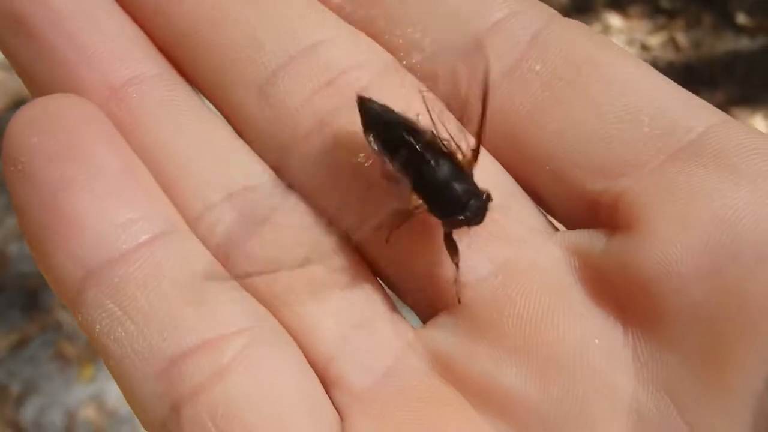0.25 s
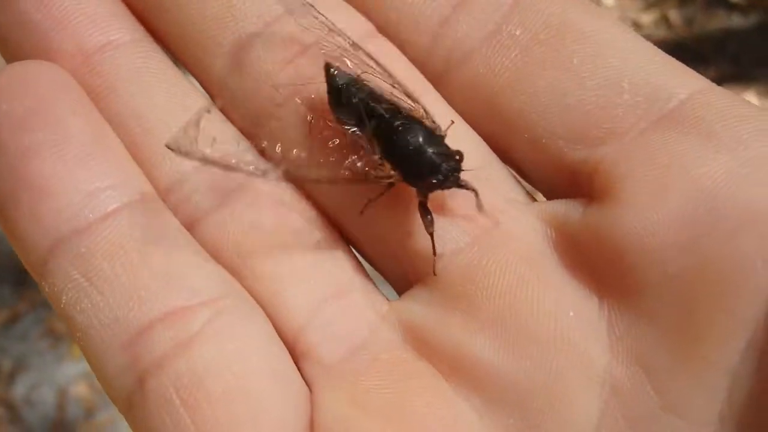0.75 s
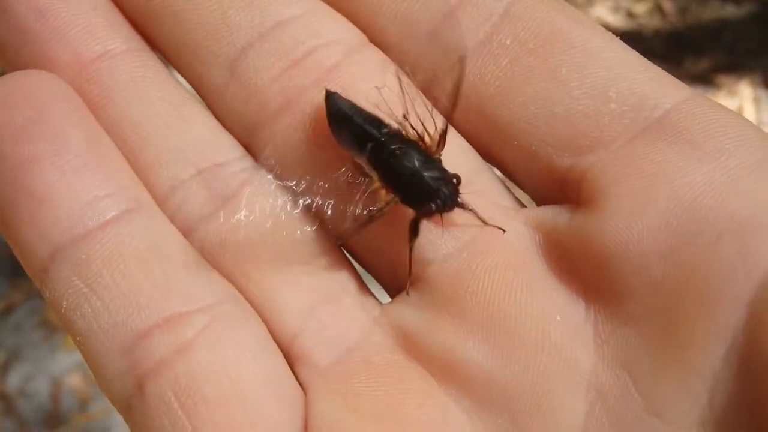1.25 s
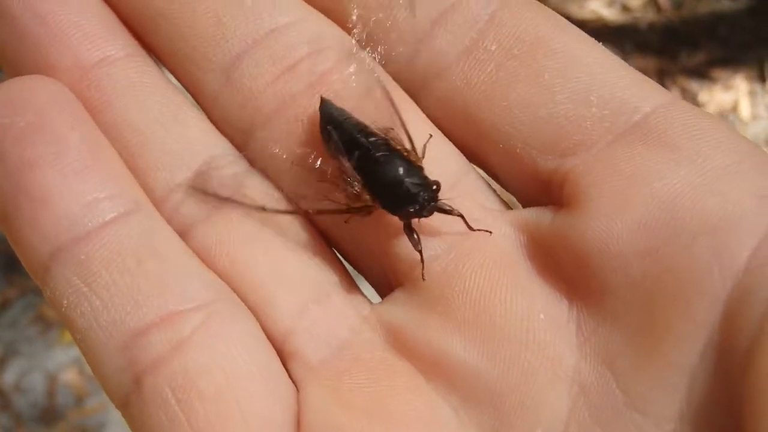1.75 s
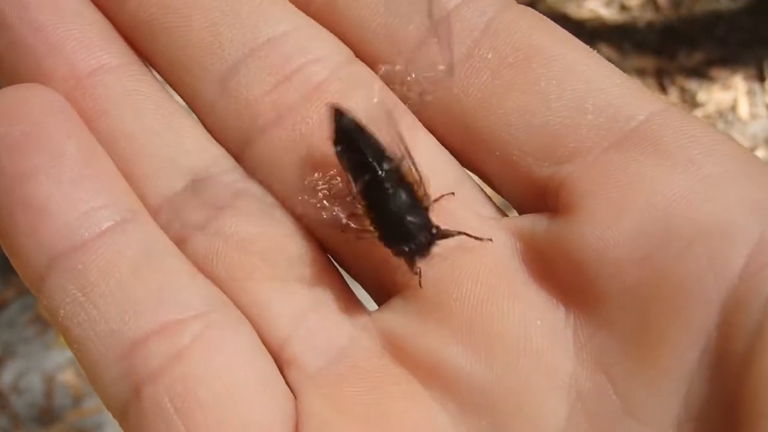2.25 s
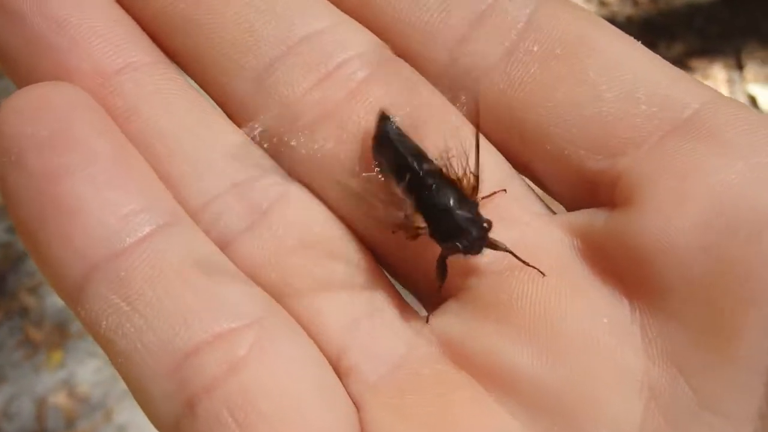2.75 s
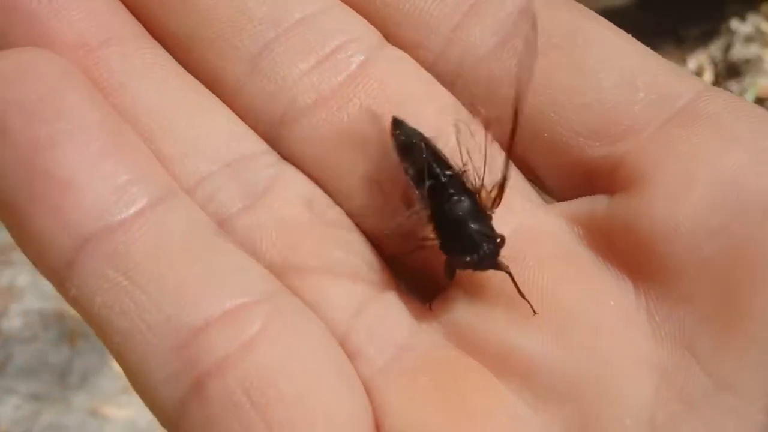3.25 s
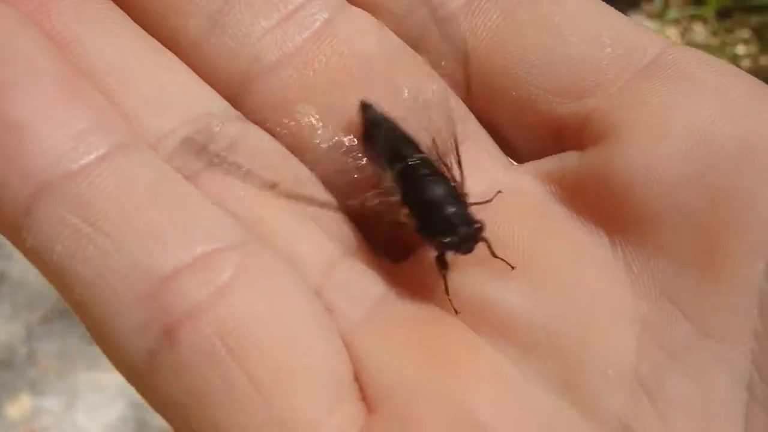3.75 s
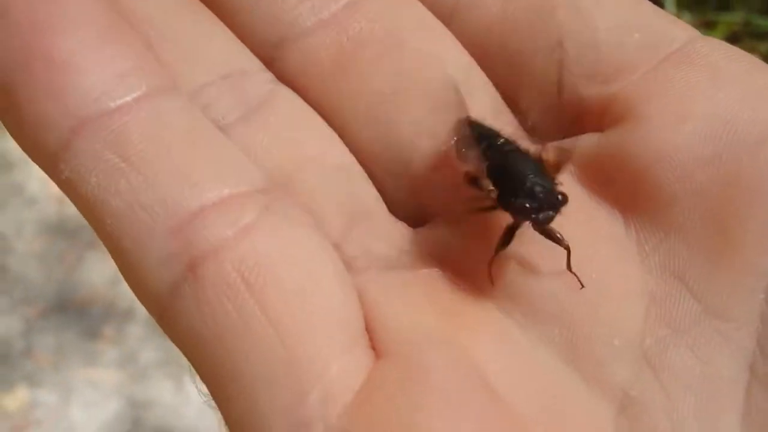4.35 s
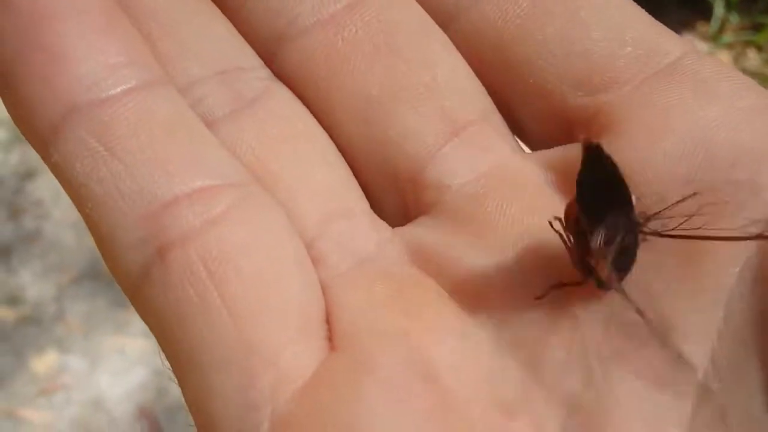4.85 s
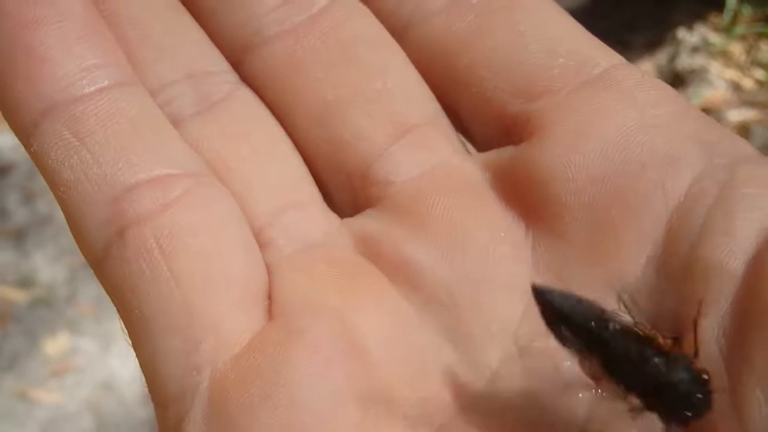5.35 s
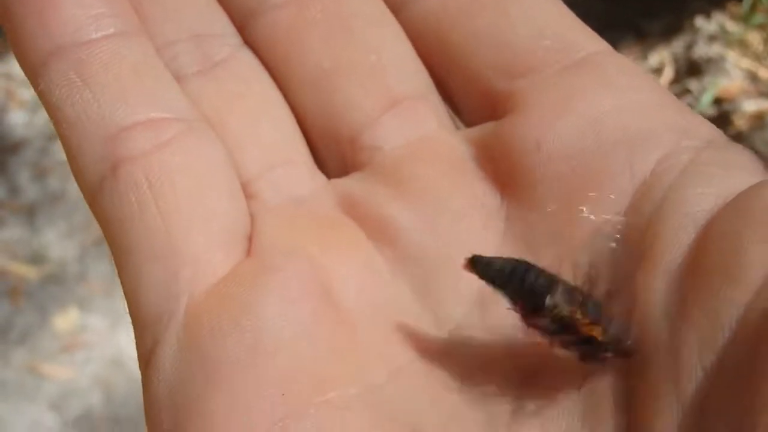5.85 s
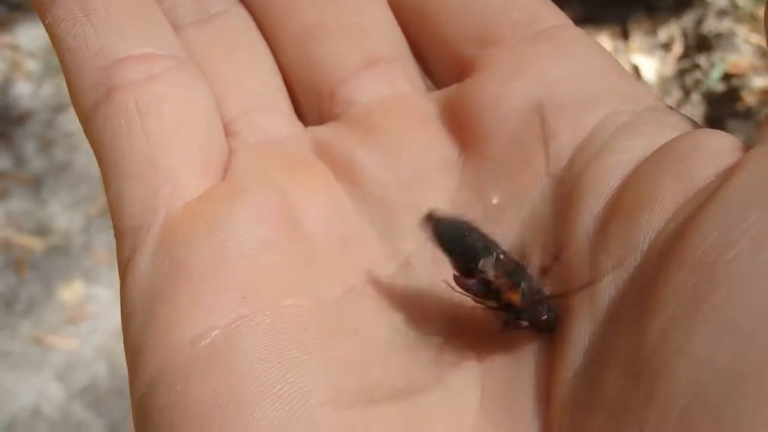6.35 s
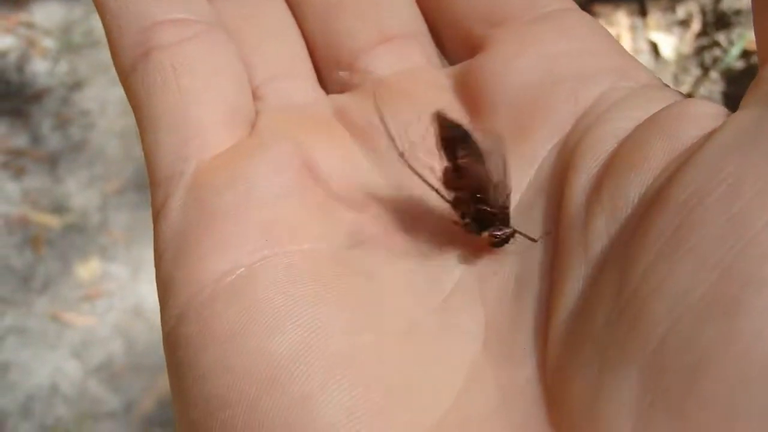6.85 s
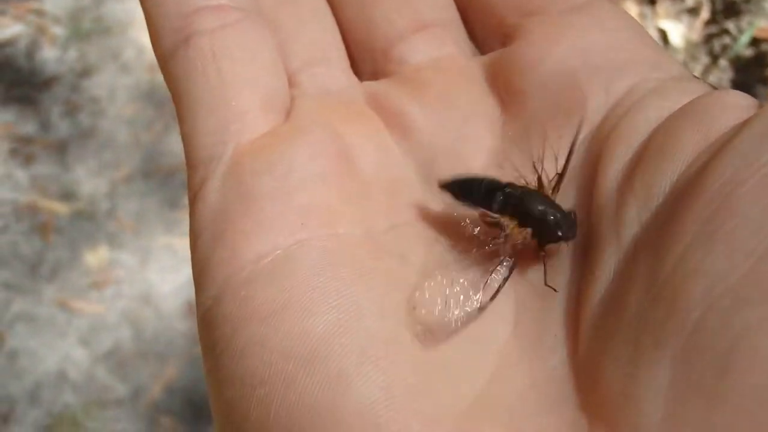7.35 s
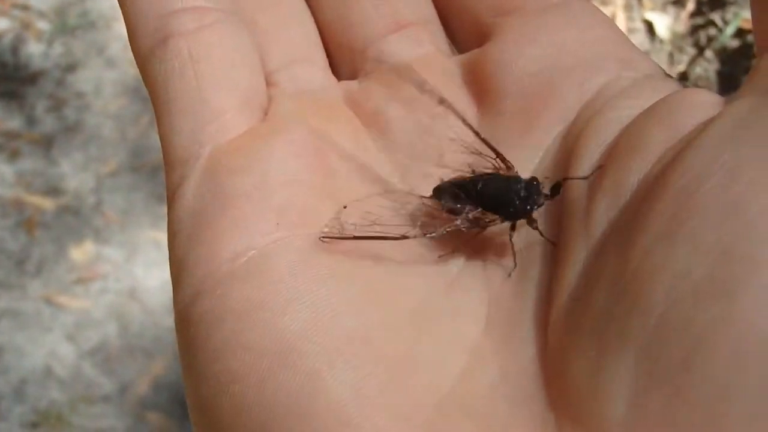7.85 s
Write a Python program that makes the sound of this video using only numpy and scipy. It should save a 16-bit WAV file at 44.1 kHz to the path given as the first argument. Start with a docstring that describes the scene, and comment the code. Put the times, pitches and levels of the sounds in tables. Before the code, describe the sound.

Dry, rapid insect wing rattle in short bursts, breaking into uneven clicks, rustles and soft slaps against skin, over a faint outdoor hush.

```python
"""A cicada on an open hand outdoors rattles its wings close by, in runs of about fifty beats a second.
Each beat is a dry snap of random clicks amid tiny slips, shaped by short resonances; single snaps fill the pauses.
Then it tumbles over the palm in flurries of uneven slaps, hollower the more they touch the skin, and stops.
Crinkling noise makes the rustle, and shaped noise and short swings make the moved air.
Under it lie soft bumps, a quiet outdoor wash of noise and a low, wavering hum."""
import sys
import numpy as np
from scipy import signal
from scipy.fft import rfft, irfft
from scipy.io import wavfile
from scipy.ndimage import uniform_filter1d

SR = 44100
rng = np.random.default_rng(int(sys.argv[2]) if len(sys.argv) > 2 else 0)


def master(y):
    """Save y as 16-bit WAV."""
    cut = np.clip(np.atleast_2d(y).T, -1, 1)
    pcm = np.round(cut * 32767)  # scale
    wavfile.write(sys.argv[1], SR, pcm.astype(np.int16))


N = 356857  # length in samples

WING_HZ, SLAP_HZ = 51, 48  # usual pace of the steady beats and of the uneven slaps
SLAP_FROM_S = 1.0  # the slaps are counted from here
SKIN_S = 3.4  # the skin mutes the rustle from here on; contact of the slaps grows around this time
RING_HZ = 4020  # the main resonance of the wings, which the skin mutes
EDGE_HZ = 15800  # upper limit of the sound
RUSTLE_PER_DOUBLING_DB = 1.75  # a run rustles more the more it scrapes

# Levels in these tables are relative: each layer also has a gain of its own.
# Steady runs of wingbeats, one list of points per run.
# Each point: time in seconds, level in dB, share of scraping from 0 to 1.
WINGBEAT_RUNS = [
    [(0.4763, -33, .08), (0.5342, -28, 0.38), (0.6109, -25.5, 0.2), (0.7699, -20, 0.19),
     (0.828, -18.5, .12), (0.8905, -19.5, 0.15), (0.9094, -17.5, 0.06), (0.9712, -20.5, 0)],
    [(1.3763, -16.5, .04), (1.4236, -26, 0.24), (1.4423, -17, 0.12), (1.5518, -20.5, 0.26),
     (1.7086, -24, 0.19), (1.8595, -21, .08), (1.8784, -17.5, .03), (1.9624, -18, 0.11), (2.0079, -22, 0)],
    [(2.4512, -21, 0.04), (2.53, -20.5, 0.5), (2.569, -25.5, 0.17), (2.6495, -19, 0.13),
     (2.6885, -23.5, 0.27), (2.8638, -19, 0.25), (2.9662, -27, .24), (3.0649, -17, 0.14),
     (3.0893, -24.5, 0.3), (3.1302, -17.5, 0.18), (3.2366, -19, 0.02)],
    [(3.5398, -23.5, .1), (3.56, -33, 0.2), (3.6564, -21.5, 0.5), (3.6998, -17, 0.3)],
    [(4.1465, -20.5, 0.6), (4.2245, -21.5, 0.76), (4.4095, -18, 0.62), (4.449, -19, .8)],
]
# The rustle and moved air that go with each run.
# Each row: rustle in dB before the effect of scraping, moved air in dB.
RUN_RUSTLE_AND_AIR = [(-36, -55.5), (-36.5, -57.5), (-35.5, -56.5), (-37.5, -53.5), (-36, -58)]
# Loud or lone snaps of a wing.
# Each row: time in seconds, level in dB, share of scraping from 0 to 1, contact with the skin from 0 to 1.
SINGLE_SNAPS = [ (1.0435, -20, 0.2, 0), (1.2008, -38, 1, 0.2), (1.3535, -34.5, .3, .2),
                (2.0687, -16, 0.01, 0.02), (2.0971, -32, .05, .02), (2.2184, -39, 0.7, 0.2),
                (2.3133, -36, .3, .4), (2.3439, -18.5, 0.02, .02), (2.4203, -37, 0.2, .02),
                (3.3244, -28.5, 0, 0.55), (3.3509, -30.5, 0.8, 0.6), (3.4126, -29, 0.4, 0),
                (3.4327, -25, 0.35, 0.35), (3.4814, -22, 0.3, 0.64), (3.7386, -20, 0.16, .2),
                (3.8373, -14.5, .09, 0.1), (3.8587, -21.5, 0.92, .3), (3.8941, -20, 0.8, 0.6),
                (3.9198, -24.5, 0, 0.4), (4.0132, -19.5, 0.27, 0.4), (4.531, -18, 0.75, 0.06),
                (4.5501, -18.5, 0.6, 0.5), (4.6854, -16, 0, 0.64), (4.7659, -23, 0.56, 0.85),
                (4.8213, -25, 0.3, 0.66), (4.8787, -24.5, 0.33, 0.2), (4.9291, -20, 0.15, 0.1),
                (4.972, -21.5, 0.5, 0.74), (4.9989, -25, 0.8, 0.55), (5.1354, -21.5, 0.8, 0.45),
                (5.1619, -27, 0, .5), (5.2027, -18, 0.04, 0.2), (5.2606, -22.5, 0.1, 0.3),
                (5.3322, -14, 0, 0.5), (5.4439, -20, 0.2, 0.1), (5.4822, -21.5, 0.6, 0.55),
                (5.5486, -14.5, 0.03, 0.36), (5.5682, -23.5, 0.8, 0.6), (5.5964, -24.5, .6, 0.2),
                (5.7327, -20.5, .8, 0.7), (5.8012, -15.5, .03, .45), (5.8375, -14, 0.13, 0.58),
                (5.9055, -30, 0.2, .5), (6.1388, -30, 0.05, 0.8), (6.161, -26.5, 0.3, 0.6),
                (6.1729, -30, 0, 0.6), (6.198, -19.5, 0.2, 1), (6.3264, -29.5, 0.3, 0.76),
                (6.3455, -25, .3, 0.2), (6.4305, -17, 0.04, 0.25), (6.4651, -23.5, .04, 0.6),
                (6.5207, -23, 0.4, 0.2), (6.6233, -24.5, 0.25, 0.76), (6.7538, -30.5, 0.4, 0.3),
                (6.7821, -24, 0.88, 0.2), (6.7993, -21, 0.24, 0.2), (6.8928, -21.5, 0.1, 0.84),
                (6.9177, -16, 0, .02), (7.0632, -20, 0.7, .6), (7.1266, -16, 0.16, 0.7),
                (7.1715, -25, 0.4, 0.4), (7.2068, -23.5, 0.1, 0.2), (7.3608, -25, 0.26, .98),
                (7.4989, -18.5, 0, 0.1), (7.5231, -16.5, .13, 0.4), (7.7063, -27, 0.4, 0),
                (7.7681, -27.5, 0.27, 0.3), (7.8469, -27, 0.3, .75)]
# Flurries of uneven twitching and thrashing on the palm.
# Each row: start in seconds, end in seconds, rustle in dB, moved air in dB.
PALM_FLURRIES = [ (1.06, 1.096, -53, -62), (1.312, 1.35, -51, -70), (3.33, 3.368, -52.5, -58),
                 (3.412, 3.499, -47.5, -56.5), (3.84, 3.946, -52, -61), (4.444, 4.623, -38, -56),
                 (4.647, 4.716, -31.5, -50), (4.764, 4.849, -46.5, -55), (4.874, 5.091, -37, -49.5),
                 (5.128, 5.168, -42, -53), (5.198, 5.212, -34, -56), (5.262, 5.358, -36.5, -51.5),
                 (5.403, 5.606, -38.5, -51), (5.645, 5.783, -33.5, -50), (5.8, 5.84, -48, -55),
                 (5.878, 5.906, -43, -66), (5.957, 6.042, -40.5, -58), (6.088, 6.235, -40, -56),
                 (6.27, 6.492, -39, -51.5), (6.512, 6.803, -40, -57), (6.85, 6.904, -40, -57.5),
                 (6.949, 6.974, -38.5, -65), (7.01, 7.186, -47.5, -62), (7.215, 7.264, -35.5, -55),
                 (7.264, 7.412, -42, -59), (7.447, 7.564, -37, -57), (7.6, 7.917, -38, -54.5)]
# Colour of the wing sounds at the left microphone port. Each row: frequency in Hz, level in dB.
WING_COLOUR_LEFT = [(200, -41), (1600, -28.5), (2300, -16.5), (3200, -9.5), (3750, -1), (4100, 1.5),
                    (4720, -12), (5040, -13), (5350, -18), (5820, -8), (6650, -13.5), (7600, -18),
                    (8800, -13.5), (10600, -18.5), (12000, -31), (15500, -39)]
# Colour of the wing sounds at the right microphone port. Each row: frequency in Hz, level in dB.
WING_COLOUR_RIGHT = [(200, -52.5), (1600, -28), (2700, -9), (3600, -8.5), (4300, -11.5), (5250, -32),
                     (5900, -31), (6900, -26.5), (7900, -39), (8800, -24), (11400, -37.5), (13800, -31),
                     (15500, -35.5)]
# Spectrum of the moved air. Each row: frequency in Hz, level in dB.
AIR_SPECTRUM = [(30, -24), (100, -15.5), (150, -4), (220, 1.5), (290, -2.5), (400, -4), (650, -7.5),
                (1100, -9), (2000, -4.5), (5000, -64)]
# The body bumps on the palm. Each row: time in seconds, level in dB.
BODY_BUMPS = [(4.689, -43), (4.764, -45), (4.93, -42), (4.975, -46), (5.336, -46.5), (5.835, -52.5)]
# Spectrum of the dull bumps. Each row: frequency in Hz, level in dB.
BUMP_SPECTRUM = [(30, -17), (100, -9), (250, -3), (600, -3), (1000, 5), (1600, -3), (4000, -31)]
# Spectrum of the surroundings. Each row: frequency in Hz, level in dB.
WASH_SPECTRUM = [(20, -21), (60, -7), (130, -3.5), (190, -6), (330, -1.5), (600, -3), (950, 0),
                 (1700, -5.5), (2800, -7.5), (5200, -9.5), (9000, -11.5), (12000, -8.5), (15500, -12.5)]
# A low hum that comes and goes. Each row: time in seconds, level in dB.
HUM_LEVEL = [(0.0, -59), (0.83, -58), (1.27, -65), (1.5, -58.5), (2.03, -67), (2.92, -58), (3.03, -68.5),
             (5.4, -64.5), (5.71, -70), (6.41, -60.5), (8.1, -74)]
# How alike noise is at the two ports. Each row: frequency in Hz, likeness from 0 to 1.
PORT_LIKENESS = [(40, 0), (250, 0.84), (1200, 0.82), (3000, 0.26), (7000, 0)]


def gain_of(db):
    """Turns decibels into amplitude."""
    return 10 ** (np.asarray(db) / 20)


def evened(x):
    """Scales a signal to an rms of 1."""
    return x / np.sqrt(np.mean(x ** 2) + 1e-20)


def read(points, hz):
    """Reads a table of frequencies and values on a log-frequency axis."""
    f, value = np.transpose(points)
    return np.interp(np.log(hz + 1), np.log(f + 1), value)


def level(rows):
    """Gives the gain at every sample from rows of seconds and dB; silent outside them."""
    s, db = np.transpose(rows)
    return gain_of(np.interp(np.arange(N) / SR, s, db, left=-np.inf, right=-np.inf))


def add(mix, s, sound):
    """Mixes a sound in, starting at time s in seconds."""
    part = mix[max(round(s * SR), 0):][:len(sound)]
    part += sound[:len(part)]


def hump(hz, centre_hz, octaves):
    """Draws a bell of height 1 on the log-frequency axis."""
    return np.exp(-(np.log2((hz + 1) / centre_hz) / octaves) ** 2)


def lumps(size, count):
    """Draws a random line through evenly spaced points."""
    points = rng.standard_normal(count)
    return np.interp(np.linspace(0, count - 1, size), np.arange(count), points)


def drift(rate_hz):
    """Wanders smoothly at random with an rms of 1, no faster than the rate."""
    slow = np.fft.rfftfreq(N, 1 / SR) < rate_hz
    return evened(irfft(rfft(rng.standard_normal(N)) * slow, N))


def noise(spectrum):
    """Makes coloured noise at both ports, as alike at each frequency as the likeness table says."""
    hz = np.fft.rfftfreq(N, 1 / SR)
    left, other = rfft(rng.standard_normal((2, N))) * gain_of(read(spectrum, hz))
    likeness = np.clip(read(PORT_LIKENESS, hz), -1, 1)
    right = likeness * left + np.sqrt(1 - likeness ** 2) * other
    return evened(irfft([left, right], N))


def bout_db(bouts, attack_db_per_s, release_db_per_s):
    """Gives the level in dB at every sample: each bout rises up to its start, holds, and fades after its end."""
    t = np.arange(0, N, 32) / SR  # a coarse grid is enough
    each = []
    for start, end, db in bouts:
        rise = attack_db_per_s * np.maximum(start - t, 0)
        fade = release_db_per_s * np.maximum(t - end, 0)
        each.append(db - rise - fade)
    loudest = np.maximum(np.max(each, axis=0), -100)
    return np.interp(np.arange(N) / SR, t, loudest)


def background(wash_db=-47.0, hum_hz=98.6, waver_hz=2.46, waver_db=1.0):
    """A quiet wash of noise, and a sine hum that wavers in pitch and level."""
    turns = np.cumsum(hum_hz + waver_hz * drift(22.3)) / SR
    hum = np.sqrt(2) * np.sin(2 * np.pi * turns) * level(HUM_LEVEL) * gain_of(waver_db * drift(5.9))
    wash = gain_of(wash_db + .5 * drift(11)) * noise(WASH_SPECTRUM)
    return wash + hum * gain_of([[-1.2], [1.2]])  # the hum is a little stronger on the right


def outdoors(x, tail_db=-22, t60=0.03, echo_db=-28, echo_s=0.0021):
    """The open air returns only one faint echo and a short scatter, which fades 60 dB in t60 seconds."""
    t = np.arange(SR // 3) / SR
    tail = rng.standard_normal((2, len(t))) * gain_of(-60 * t / t60) * (t > .003)
    tail *= gain_of(tail_db) / np.linalg.norm(tail[0])
    tail[:, round(echo_s * SR)] += gain_of(echo_db)
    return x + signal.fftconvolve(x, tail, axes=1)[:, :N]


def bumps(db=11.0, t60=0.029):
    """Soft skin takes the body's blow without ringing: a burst of dull noise that fades at once."""
    t, envelope = np.arange(SR // 8) / SR, np.zeros(N)
    for s, blow_db in BODY_BUMPS:
        add(envelope, s, gain_of(blow_db - 60 * t / t60))
    return gain_of(db) * envelope * noise(BUMP_SPECTRUM)


def activity():
    """Gives the gains of rustle and moved air: both follow the runs and flurries, the air more slowly."""
    rows = list(PALM_FLURRIES)
    for run, (run_rustle_db, run_air_db) in zip(WINGBEAT_RUNS, RUN_RUSTLE_AND_AIR):
        for a, b in zip(run, run[1:]):
            scrape = max((a[2] + b[2]) / 2, .02)
            rows.append((a[0], b[0], run_rustle_db + RUSTLE_PER_DOUBLING_DB * np.log2(scrape), run_air_db))
    start, end, rustle_db, air_db = np.transpose(rows)
    rustling = bout_db(zip(start, end, rustle_db), attack_db_per_s=1300, release_db_per_s=602)
    air = bout_db(zip(start, end, air_db), attack_db_per_s=300, release_db_per_s=174)
    return gain_of(rustling), gain_of(air)


def flutter(force, gain, db=4.5, push=0.89):
    """Turbulent air: noise that swells around each stroke of the wings."""
    power = abs(uniform_filter1d(force ** 2, size=350)) + 1e-12
    pulse = power / (abs(uniform_filter1d(power, size=1500)) + 1e-12)  # against its surroundings
    push = np.clip(push, 0, 1)  # share of the air that follows the strokes
    return gain_of(db) * gain * np.sqrt(1 - push + push * pulse) * noise(AIR_SPECTRUM)


def swings(runs, light, air, db=7.0, start_hz=265, settled_hz=203, settle_s=0.27,
           thrash_hz=170, thrash_db=2.0):
    """Lists time, Hz and gain of the air swings: they sink as a run settles, and are deeper in flurries."""
    rows = []
    for run in runs:
        for s in run[:, 0]:
            unsettled = np.exp(-(s - run[0, 0]) / settle_s)
            rows.append((s, settled_hz + (start_hz - settled_hz) * unsettled, db))
    rows += [(s, thrash_hz, thrash_db) for s in light[:, 0]]
    s, hz, swing_db = np.transpose(rows)
    return np.transpose([s, hz, gain_of(swing_db) * np.interp(s, np.arange(N) / SR, air)])


def whirr(rows, swing_ms=3.2, lead_ms=2.5):
    """Just before a beat or slap the wing swings the air; steady beats join into a soft pitched whirr."""
    ms = np.arange(-SR // 100, SR // 100) * 1000 / SR + lead_ms
    bell = np.exp(-.5 * (ms / swing_ms) ** 2)
    out = np.zeros(N)
    for s, hz, gain in rows:
        swing = -gain * np.cos(2 * np.pi * hz * ms / 1000) * bell
        add(out, s - len(ms) / 2 / SR, swing)
    return out


def rustle(gain, db=6.0, clump_db=4.5, tumble_clump_db=6.5, muted_db=-1.5):
    """Tiny crinkles of the wings; later they come in stronger clumps, and the skin mutes their ring."""
    hz, tumbling = np.fft.rfftfreq(N, 1 / SR), np.arange(N) > SKIN_S * SR
    crinkle_db = 2.5 * np.minimum(rng.exponential(1, N), 4)
    free = evened(rng.standard_normal(N) * gain_of(crinkle_db))
    muted = irfft(rfft(free) * gain_of(muted_db * hump(hz, RING_HZ, 0.15)), N)
    clumps = gain_of(np.where(tumbling, tumble_clump_db, clump_db) * np.clip(drift(240), -2, 2))
    clumps /= np.sqrt(uniform_filter1d(clumps ** 2, size=1500))  # keeps the longer-term level
    return gain_of(db) * gain * np.where(tumbling, muted, free) * clumps


def slaps(over_rustle_db=9.0, uneven_db=1.5, stray=0.3, scrape=0.21, contact=0.24,
          contact_per_s=0.074, spread=0.18):
    """In a flurry the beat loses its pace: light slaps of chance timing and force, ever deeper in the palm."""
    grid = np.arange(SLAP_FROM_S, N / SR, 1 / SLAP_HZ)
    late, force, rough, deep = rng.standard_normal((len(grid), 4)).T
    s = grid + stray * late / SLAP_HZ
    # outside the flurries the level falls away to nearly nothing
    flurry_db = bout_db([row[:3] for row in PALM_FLURRIES], attack_db_per_s=2000, release_db_per_s=1500)
    db = np.interp(s, np.arange(N) / SR, flurry_db) + over_rustle_db + uneven_db * np.clip(force, -2, 2)
    touching = contact + contact_per_s * (s - SKIN_S) + spread * deep
    return np.transpose([s, db, scrape + spread * rough, touching])


def beats(run, jitter_s=.0003, uneven_db=0.5, contact_per_scrape=0.78):
    """Fills a run with even wingbeats, each a little off in time and force; scraping ones touch the skin."""
    run = np.array(run, float)
    steps = []
    for a, b in zip(run, run[1:]):
        count = max(round((b[0] - a[0]) * WING_HZ), 1)
        steps.append(np.linspace(a, b, count, endpoint=False))
    rows = np.vstack(steps + [run[-1:]])
    rows[:, :2] += rng.standard_normal((len(rows), 2)) * [jitter_s, uneven_db]
    return np.column_stack([rows, contact_per_scrape * rows[:, 2]])


def touch(db, contact, usual_db=-22, knock_db=-9.5, skin_knock_db=15.0, knock_slope=0.15, bright_db=-2.0,
          skin_bright_db=6.5, bright_slope=0.22, skin_mute_db=-3.0, knock_spread_db=1.0, bright_spread_db=2.67):
    """Gives knock, brightness and muting in dB: hard, free snaps ring purest; light or skin ones are broader."""
    lighter, contact = np.clip(usual_db - db, -10, 10), np.clip(contact, 0, 1)
    hollow, bright = rng.standard_normal(2)
    knock = knock_db + skin_knock_db * contact + knock_slope * lighter + knock_spread_db * hollow
    brightness = bright_db + skin_bright_db * contact + bright_slope * lighter + bright_spread_db * bright
    return knock, brightness, skin_mute_db * contact


def stroke(db, scrape, knock_db, bright_db, mute_db, buckle_ms=0.32, smear_ms=0.36, scrape_ms=2.85,
           drag_ms=1.8, stick_db=2.0, colour_db=4.0, knock_hz=2400, ping_hz=6100, damping=0.48, size=1024):
    """One wing stroke: the membrane buckles in a tight burst of clicks amid a few ms of tiny slips."""
    ms, hz = (np.arange(size) - size // 2) * 1000 / SR, np.fft.rfftfreq(size, 1 / SR)
    scrape = np.clip(scrape, .02, 1)
    burst = np.exp(-.5 * (ms / (buckle_ms + smear_ms * scrape)) ** 2)
    buckle = rng.standard_normal(size) * (ms >= 0) * burst
    # the wing catches and lets go about once a ms as it drags
    slips = rng.standard_normal(size) * gain_of(stick_db * lumps(size, count=34))
    rub = (ms - .5) / (scrape_ms + drag_ms * scrape)
    slips *= (rub > -1) * np.exp(-.5 * rub ** 4)
    # both forces spread their energy evenly over the broad bands
    parts = rfft(np.array([buckle, slips]))
    parts /= np.sqrt(uniform_filter1d(abs(parts) ** 2, size=45))
    # a blow on the skin sounds hollow and damps the high ping
    tone_db = knock_db * (hump(hz, knock_hz, 0.42) - damping * hump(hz, ping_hz, 0.4))
    tone_db += mute_db * hump(hz, RING_HZ, 0.23)
    tone_db += bright_db * np.clip(np.log2((hz + 1) / 4600), 0, 1.2)
    # no two strokes bend the wing alike
    tone_db += colour_db * (0.55 + 0.74 * scrape) * lumps(len(hz), count=40)
    mixed = np.sqrt(1 - scrape) * parts[0] + np.sqrt(scrape) * parts[1]
    return gain_of(db) * irfft(mixed * gain_of(tone_db))


def strokes(rows, db):
    """Plays wing strokes from rows of time, level, scraping and contact, each centred on its time."""
    out = np.zeros(N)
    for s, blow_db, scrape, contact in rows:
        sound = stroke(blow_db, scrape, *touch(blow_db, contact))
        add(out, s - len(sound) / 2 / SR, sound)
    return gain_of(db) * out


def ring(spectrum, delay_ms=0, size=2048):
    """Makes a short resonance with the given spectrum that starts only when struck (minimum phase)."""
    hz = np.fft.fftfreq(size, 1 / SR)
    log_gain = np.log(gain_of(read(spectrum, abs(hz))))
    phase = -signal.hilbert(log_gain).imag - 2 * np.pi * hz * delay_ms / 1000
    return np.fft.ifft(np.exp(log_gain + 1j * phase)).real[:size // 2]


def wing_force(runs, light, rustling):
    """Adds up the forces on one wing: steady beats, single snaps, light slaps and the rustle."""
    steady = strokes(np.vstack(runs), db=26.0)
    return steady + strokes(SINGLE_SNAPS, db=27.5) + strokes(light, db=28.0) + rustle(rustling)


def scene(likeness=0.96):
    """All wing forces ring alike; the right port hears them later, duller and with some of the other wing."""
    runs, light = [beats(run) for run in WINGBEAT_RUNS], slaps()
    rustling, air = activity()
    near = wing_force(runs, light, rustling)
    far = wing_force(runs, light, rustling)
    likeness = np.clip(likeness, 0, 1)
    force = np.array([near, likeness * near + np.sqrt(1 - likeness ** 2) * far])
    ports = np.array([ring(WING_COLOUR_LEFT), ring(WING_COLOUR_RIGHT, delay_ms=0.032)])
    wings = signal.oaconvolve(force, ports / np.linalg.norm(ports[0]), axes=1)[:, :N]
    moved_air = flutter(near, air) + whirr(swings(runs, light, air))
    return outdoors(wings) + moved_air + bumps() + background()


def record(dry):
    """Rounds off the sharpest peaks just under full scale, then cuts what lies above the upper limit."""
    rounded = dry / (1 + (dry / .96) ** 8) ** (1 / 8)
    low_pass = signal.firwin(511, EDGE_HZ, window=("kaiser", 9), fs=SR)
    return signal.oaconvolve(rounded, low_pass[None], "same")


dry = scene()
out = record(dry)
master(out)
```